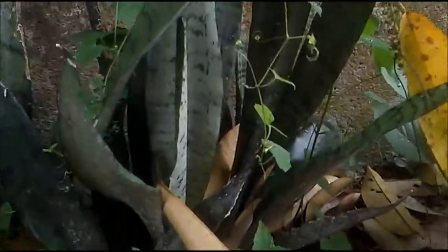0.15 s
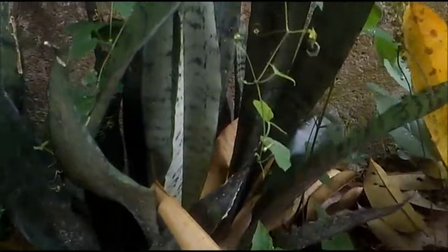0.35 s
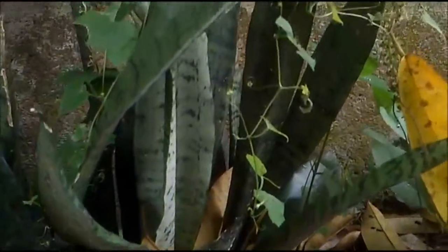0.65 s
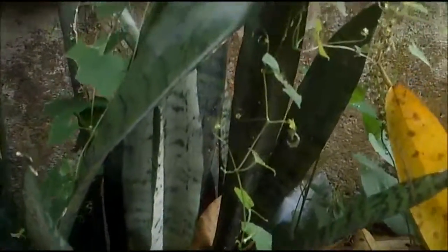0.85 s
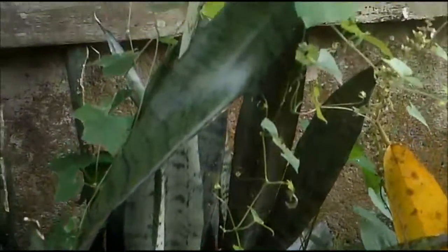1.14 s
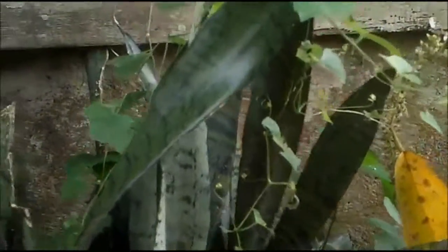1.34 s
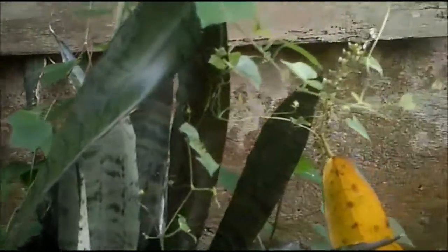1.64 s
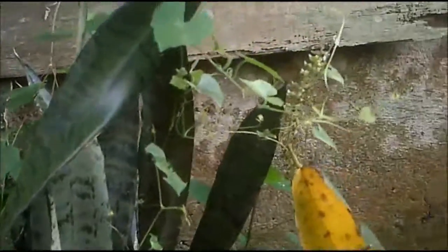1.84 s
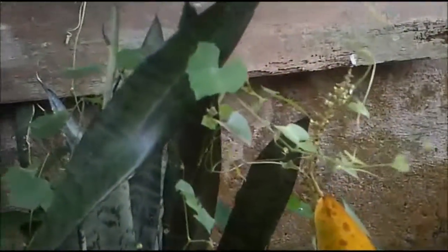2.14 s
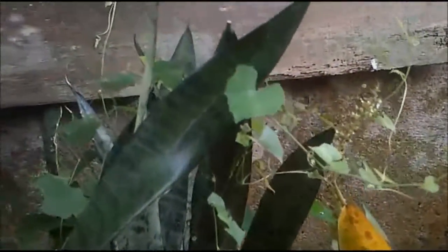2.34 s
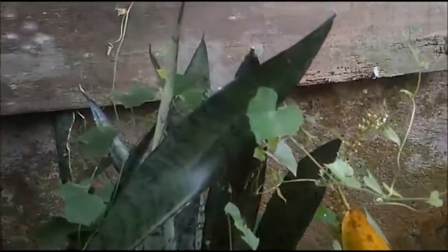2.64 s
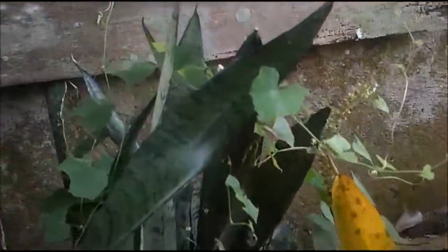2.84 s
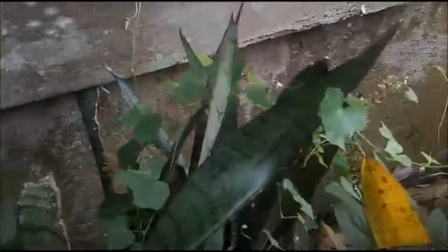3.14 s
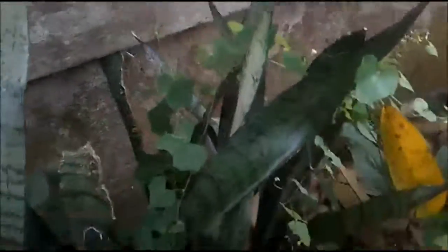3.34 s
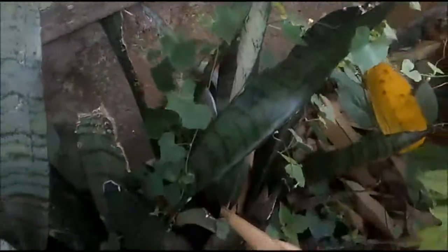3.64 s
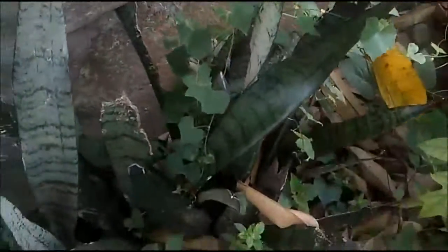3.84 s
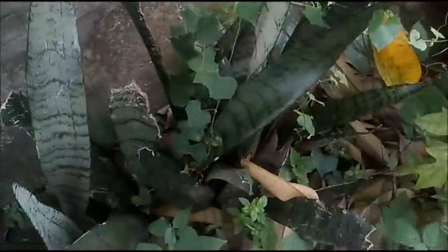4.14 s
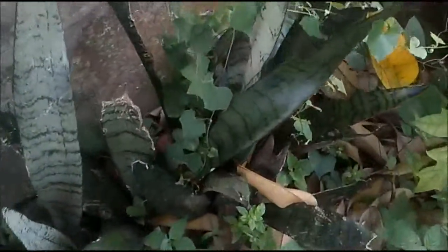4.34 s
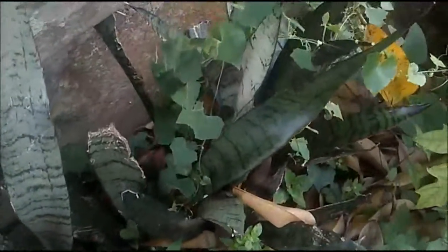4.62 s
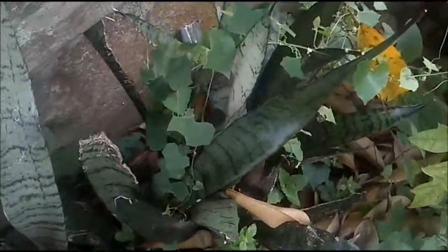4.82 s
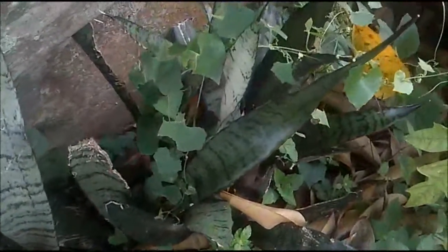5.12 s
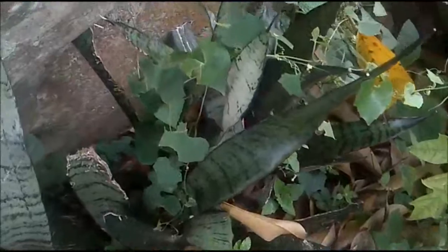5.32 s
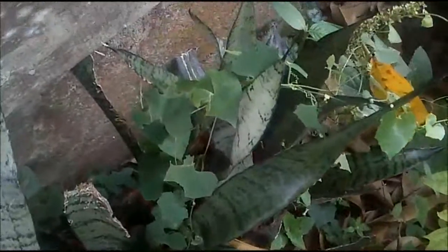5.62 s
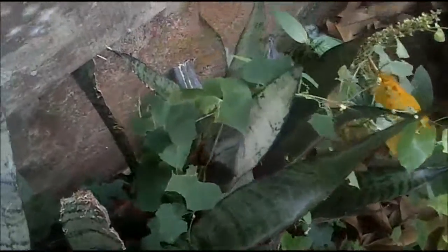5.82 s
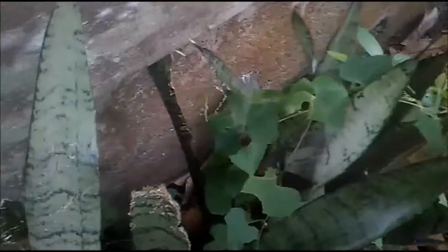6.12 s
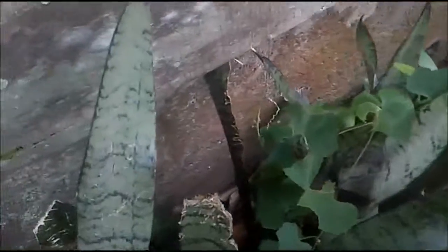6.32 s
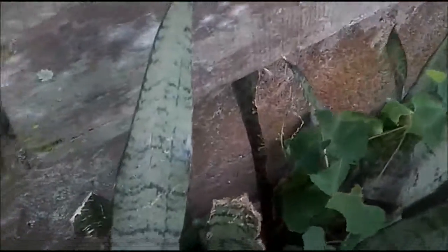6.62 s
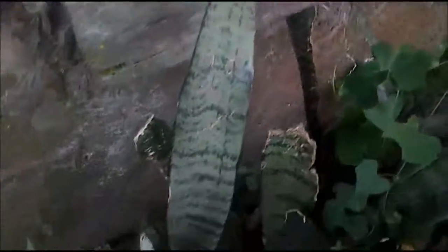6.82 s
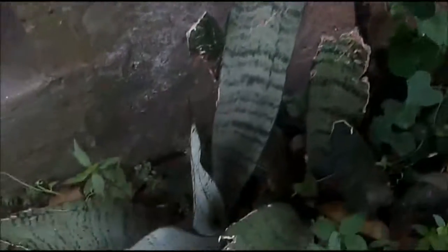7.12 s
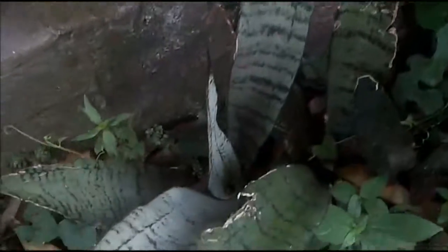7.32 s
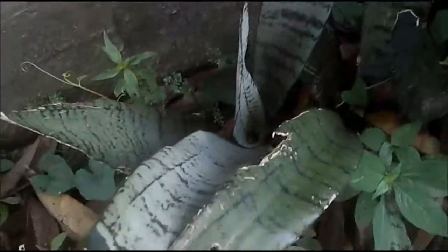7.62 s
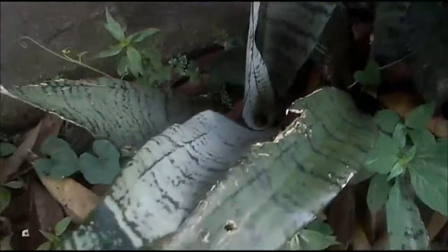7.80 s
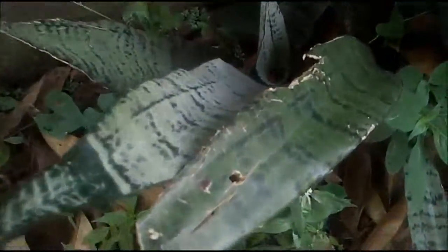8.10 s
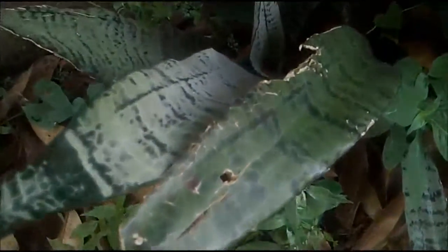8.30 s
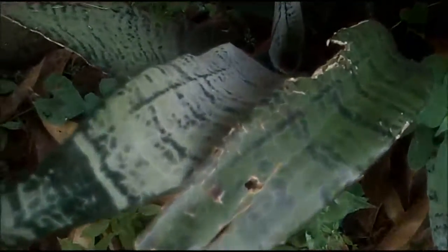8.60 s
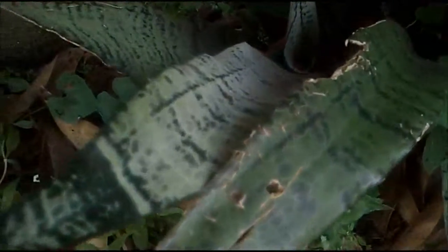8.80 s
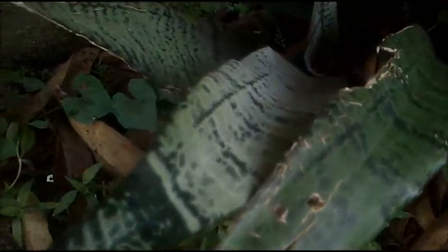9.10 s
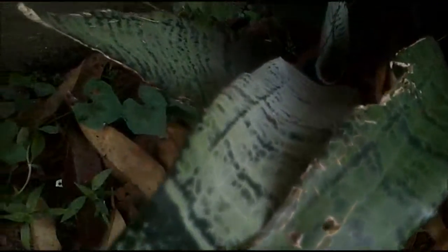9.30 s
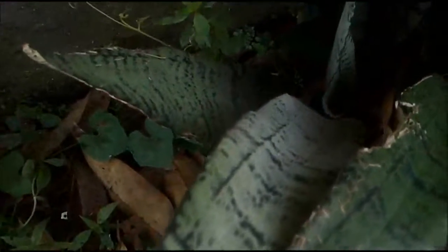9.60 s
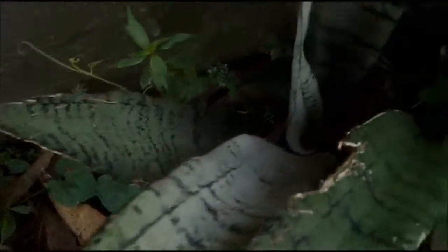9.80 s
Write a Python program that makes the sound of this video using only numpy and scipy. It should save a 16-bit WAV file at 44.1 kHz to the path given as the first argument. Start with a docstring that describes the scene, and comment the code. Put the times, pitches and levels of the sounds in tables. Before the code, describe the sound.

Lively garden birdsong in rapid high notes, a harsh scold midway, then an echoing second bird, with soft wind rumble and ticking leaves underneath.

```python
"""Small birds in a garden

Birds sing straight ahead: dry whistles, sweeps and trills, drawn as gliding tones, with a scold and a far wheeze.
A farther bird on the left adds notes and nasal chips that hang between the walls in decaying noise echoes.
Wind pushes slowly on the stereo microphone and leaves hiss and tick all around: shaped noise and short clicks.
Dull garden noise lies underneath.
"""
import sys
import numpy as np
from scipy import signal
from scipy.fft import rfft, irfft, next_fast_len
from scipy.io import wavfile
from scipy.ndimage import uniform_filter1d, map_coordinates

SR = 44100
rng = np.random.default_rng(int(sys.argv[2]) if len(sys.argv) > 2 else 0)


def store_wav(level_fs):
    """Save 16-bit WAV to argv[1]."""
    pcm = np.round(np.clip(np.atleast_2d(level_fs), -1, 1) * 32767)
    wavfile.write(sys.argv[1], SR, pcm.T.astype(np.int16))


N = 438794  # samples


def amp(db):
    """dB to gain."""
    return 10 ** (np.asarray(db) / 20)


def unit(x):
    """Scaled to rms 1."""
    return x / np.sqrt(np.mean(x ** 2) + 1e-20)


def along(points, hz):
    """Read (frequency [Hz], value) points on a log frequency axis."""
    f, v = np.transpose(points)
    return np.interp(np.log(hz + 1), np.log(f + 1), v)


def over_time(points):
    """Read (time [s], value) points at every sample."""
    return np.interp(np.arange(N) / SR, *np.transpose(points))


def wobble(rate, size):
    """A smooth random curve, rate knots a second."""
    knots = rng.standard_normal(int(size * rate / SR) + 4)
    return map_coordinates(knots, [np.arange(size) * rate / SR])


def filtered(x, response):
    """x shaped by a response of frequency."""
    m = next_fast_len(N + SR // 2)
    return irfft(rfft(x, m) * response(np.fft.rfftfreq(m, 1 / SR)), m)[..., :N]


def empty_track():
    """Silence with a spare second before and after."""
    return np.zeros(N + 2 * SR)


def add(track, s, sound):
    """Mix a sound in at s seconds; the track starts one second early."""
    track[round((s + 1) * SR):][:len(sound)] += sound


def trimmed(track):
    """The track without its spare seconds."""
    return track[SR:SR + N]


# stereo width of the noise around the microphone, side against mid: (frequency [Hz], level [dB])
SIDE_AGAINST_MID = [(60, -33), (200, -23), (380, -13), (700, -10), (1290, -12), (2380, -13.5), (4400, -3),
                    (8120, -27), (11500, -21), (15000, -11)]


def wide(mid, side, spectrum):
    """Coloured stereo of rms 1 from two unrelated signals."""
    def response(f):
        return amp(along(spectrum, f) + [0 * f, along(SIDE_AGAINST_MID, f)])

    mid, side = filtered(np.array([mid, side]), response)
    return unit(np.array([mid + side, mid - side]))


# level of the garden noise at the microphone: (time [s], level [dB])
GARDEN_LEVEL = [(0, -41), (4.6, -42), (6.4, -45.5), (9.95, -46)]
# colour of the garden noise: (frequency [Hz], relative level [dB])
GARDEN_COLOUR = [(35, -6), (60, -5.5), (152, -10), (496, -14.5), (1070, -20.5), (2080, -25), (3200, -32.5),
                 (4160, -44), (7040, -120)]


def garden_noise():
    """A dull, broad bed of noise whose spectrum falls toward the treble."""
    mid, side = rng.standard_normal((2, N))
    return wide(mid, side, GARDEN_COLOUR) * amp(over_time(GARDEN_LEVEL))


# strength of the breeze through the garden: (time [s], level [dB])
BREEZE = [(0, -8), (.8, -4), (1.3, -3), (1.8, 1.5), (2.7, 0), (4.2, 1.5), (5.3, .6), (6.1, -3.6), (7.4, -6),
          (8.6, -5), (9.95, -12)]


def breeze():
    """The breeze in dB that drives both wind pressure and leaves."""
    return over_time(BREEZE)


# colour of the wind pressure on the microphone: (frequency [Hz], relative level [dB])
WIND_PRESSURE = [(1.2, -18), (2.0, 1), (20, 4), (30, -18.5), (54, -23), (110, -51), (240, -120)]


def wind(breeze_db):
    """Low noise pushes on both ports; they differ a little more as the pressure changes faster."""
    def response(f):
        return amp(along(WIND_PRESSURE, f)) * [1 + 0 * f, f / 6000]

    push, tilt = filtered(rng.standard_normal((2, N)), response)
    # -17 dB at breeze 0 dB; the pressure swings wider than the breeze
    return unit(np.array([push + tilt, push - tilt])) * amp(-17 + 1.6 * breeze_db)


def crackle(rate, spread_db):
    """Sparse clicks under 3 ms long at rate per second, most of them small."""
    sizes_db = spread_db * np.minimum(rng.exponential(size=N), 2.5)
    hits = (rng.random(N) < rate / SR) * amp(sizes_db)
    decay = amp(-np.arange(120) * 0.18)  # dB per sample
    return unit(np.convolve(hits, decay)[:N] * rng.standard_normal(N))


# colour of the leaves all around: (frequency [Hz], relative level [dB])
LEAF_COLOUR = [(1760, -1), (3000, -10), (3990, -5.5), (5570, -2.5), (6670, -2), (8690, -4.5), (11100, 0.5),
               (13900, -2.5), (15800, -9)]


def leaves(breeze_db):
    """Hiss with fine crackle follows the breeze and flickers at three speeds."""
    grains = [rng.standard_normal(N) + .5 * crackle(200, spread_db=6.5) for _ in range(2)]
    flicker_db = 0.39 * wobble(6, size=N) + 1.4 * wobble(22, size=N) + 1.2 * wobble(60, size=N)
    return wide(*grains, LEAF_COLOUR) * amp(-40 + breeze_db + flicker_db)


# loud leaf ticks near the microphone: (time [s], starting level [dB])
LEAF_TICKS = [(.841, -26), (1.732, -25), (2.1609, -23.5), (3.211, -27), (3.3009, -28), (4.0108, -27),
              (4.129, -24), (4.2352, -25), (4.4443, -26), (4.6788, -24), (5.1188, -24.5), (8.4652, -30),
              (8.6537, -31), (8.8992, -27), (8.989, -30), (9.2374, -27)]


def ticks():
    """Each tick is a short noisy snap around its own pitch, a little to one side."""
    left, right = empty_track(), empty_track()
    t = np.arange(SR // 50) / SR
    for s, db in LEAF_TICKS:
        noise = rng.standard_normal(len(t))
        pitch_shift, to_left = rng.standard_normal(2)
        centre_hz = 10900 * (1 + .06 * pitch_shift)
        band = signal.lfilter(*signal.iirpeak(centre_hz, 2.1, SR), noise)
        snap = amp(db - 60 * t / .014) * unit(band)  # 60 dB down in 14 ms
        add(left, s, snap * amp(0.95 * to_left))
        add(right, s, snap * amp(-1.2 * to_left))
    return np.array([trimmed(left), trimmed(right)])


def controls(rows, fade=.005):
    """Time, rounded pitch and rms gain per sample of a note with soft ends (fade in seconds)."""
    s, hz, db = np.transpose(rows)
    t = np.arange(s[0] - fade / 2, s[-1] + fade / 2, 1 / SR)
    ends = np.clip(np.minimum(t - t[0], t[-1] - t) / fade, 0, 1)
    log_hz = np.interp(t, s, np.log(hz))
    pitch = uniform_filter1d(log_hz, size=min(len(t) // 6, 500), mode="nearest")
    return t, np.exp(pitch), amp(np.interp(t, s, db)) * np.sin(ends * np.pi / 2) ** 2


def whistle(hz, gain, second_db, flutter_db):
    """A nearly pure tone with an unsteady level; its octave shows more on high notes."""
    phase = 2 * np.pi * np.cumsum(hz) / SR
    octave = amp(second_db) * (np.minimum(hz, 5000) / 4000) ** 2 * np.sin(2 * phase)
    flutter = amp(flutter_db * wobble(200, size=len(hz)))
    return np.sqrt(2) * gain * flutter * (np.sin(phase) + octave)


def note(s, length, from_hz, bend_hz, to_hz, bend, peak_db, peak):
    """Rows of a note that bends once and swells once."""
    u = np.unique([0, bend, peak, 1])
    hz = np.exp(np.interp(u, [0, bend, 1], np.log([from_hz, bend_hz, to_hz])))
    db = peak_db - 14 * np.abs(u - peak)  # dB lost over a whole note length away from the peak
    return np.transpose([s + length * u, hz, db])


def run(start_s, count, gap_s, grow_s, soft_db=0, tire_db=0, climb=0, name=None):
    """(name, time [s], gain [dB], pitch ratio) for each member of an even run with growing gaps."""
    members = []
    for k in range(count):
        s = start_s + k * gap_s + k * (k - 1) / 2 * grow_s
        db = -soft_db * .4 ** k - tire_db * k  # the soft start wears off, then the run tires
        members.append((name, s, db, 1 + climb * k))
    return members


def song(notes, syllables, repeats, runs, second_db):
    """Single notes, and syllables sung at their times, levels and pitches."""
    track = empty_track()
    sung = [(note(*row), 0, 0, 1) for row in notes]
    calls = list(repeats)
    for row in runs:
        calls += run(**row)
    for name, s, db, ratio in calls:
        sung += [(stroke, s, db, ratio) for stroke in syllables[name]]
    for rows, s, db, ratio in sung:
        t, hz, gain = controls(rows)
        # faint birds are far away, and moving air makes them flicker
        flutter_db = np.interp(20 * np.log10(gain.max()), [-36, -22], [3.2, .9])
        add(track, s + t[0], whistle(hz * ratio, gain * amp(db), second_db, flutter_db))
    return trimmed(track)


def diffuse_echoes(x, decays):
    """Stereo echoes as a noise tail; each frequency dies at its own speed."""
    hz, t, z = signal.stft(rng.standard_normal((2, SR)), SR, nperseg=256)
    dying = z * amp(-60 * t / along(decays, hz)[:, None])
    tail = signal.istft(dying, SR, nperseg=256)[1]
    delayed = np.pad(x, (150, 0))  # samples
    return signal.fftconvolve(delayed[None], tail / np.linalg.norm(tail[0]), axes=1)[:, :N]


# single notes of the farther bird on the left: (time [s], length [s], first pitch [Hz], bend pitch [Hz],
# last pitch [Hz], bend place [0-1], peak level [dB], peak place [0-1])
LEFT_SINGLE_NOTES = [(7.294, .012, 2900, 3250, 3400, .5, -40, .6),
                     (7.202, .006, 2120, 2830, 3780, .5, -45, .4),
                     (7.247, .006, 2255, 3010, 4020, .5, -39, .4),
                     (7.99, .05, 4350, 4620, 4900, .5, -47, .6),
                     (8.095, .015, 3230, 3510, 3810, .5, -42, .6),
                     (7.848, .075, 1300, 1900, 2030, .15, -26, .85),
                     (7.963, .057, 1250, 1930, 2030, .2, -31, .85)]
# its syllables by name, stroke by stroke: (time from the start [s], pitch [Hz], level [dB])
LEFT_STROKES = dict( intro=[[(0, 2700, -33), (.031, 2150, -32), (.053, 2830, -24), (.09, 2790, -28)],
                [(.147, 3900, -28), (.165, 4450, -24), (.181, 6970, -44), (.193, 3900, -21),
                (.207, 3150, -22), (.22, 3050, -30)]], sweep=[[(0, 3900, -27), (.006, 2370, -27.5),
                (.022, 3480, -20), (.037, 4940, -22.5), (.052, 5210, -26.5)], [(-.027, 13280, -50),
                (.004, 13120, -56)]], dive=[[(.001, 8400, -38), (.009, 4320, -20), (.017, 2750, -27),
                (.031, 2500, -26.5), (.062, 2760, -24), (.092, 3320, -22)]], dip=[[(.004, 1760, -38.5),
                (.025, 980, -47.5), (.047, 2180, -27.5), (.062, 2110, -33)]], closer=[[(0, 3540, -41),
                (.007, 6840, -27.5), (.015, 6560, -36), (.03, 5980, -27)], [(.01, 6850, -38),
                (.062, 6800, -45)]], )
# its syllables sung one at a time: (name, time [s], gain [dB], pitch ratio)
LEFT_CALLS = [("intro", 7.3, 0, 1), ("sweep", 8.118, 0, .985), ("sweep", 8.276, .5, 1.005),
              ("sweep", 8.432, 1, .98), ("sweep", 8.585, 0, 1.003), ("sweep", 8.747, -1, .98),
              ("closer", 9.885, 0, 1)]
# its even runs: name, start [s], count, first gap [s], growth of each gap [s], soft start [dB],
# level lost per syllable [dB], pitch gained per syllable [ratio]
LEFT_EVEN_RUNS = [ dict(name="dive", start_s=8.905, count=3, gap_s=.193, grow_s=.011, soft_db=.6, tire_db=.1, climb=-.005),
                  dict(name="dip", start_s=9.458, count=4, gap_s=.1035, grow_s=.0008, tire_db=.4, climb=.026),
                  ]


def left_song():
    """The left bird's whistles, with little octave in them."""
    return song(LEFT_SINGLE_NOTES, LEFT_STROKES, LEFT_CALLS, LEFT_EVEN_RUNS, second_db=-46)


# run of chip pairs from the left: start [s], count, first gap [s], growth of each gap [s], soft start [dB]
CHIP_RUN = dict(start_s=7.595, count=4, gap_s=.045, grow_s=.006, soft_db=4.5)
# overtones 3 to 6 of a chip, in order: (relative level [dB])
CHIP_OVERTONES = [-7, 0.5, -7, 1.5]


def chatter():
    """Pairs of short nasal chips: a falling stack of overtones."""
    track, t = empty_track(), np.arange(round(0.0074 * SR)) / SR
    phase = 2 * np.pi * np.cumsum(np.linspace(1060, 860, len(t))) / SR
    stack = sum(amp(db) * np.sin(k * phase) for k, db in enumerate(CHIP_OVERTONES, start=3))
    breathy_edge = 1 + 0.5 * rng.standard_normal(len(t))
    chip = np.hanning(len(t)) * stack * breathy_edge
    for _, s, db, _ in run(**CHIP_RUN):
        for delay_s in (0, .013):
            add(track, s + delay_s, amp(-35.5 + db) * chip)
    return trimmed(track)


# single walls that answer the left bird: (delay [s], level [dB])
WALL_ANSWERS = [(.009, -15.5), (.0415, -23), (.058, -25)]
# dying of the echoes between the walls: (frequency [Hz], time to fall 60 dB [s])
WALL_DECAY = [(1500, 0.48), (3000, 0.64), (7000, 0.63)]


def between_walls(bird):
    """The bird with single wall echoes and a diffuse stereo tail."""
    def answers(f):
        return sum(amp(db) * np.exp(-2j * np.pi * f * s) for s, db in WALL_ANSWERS)

    tail = diffuse_echoes(bird, WALL_DECAY)
    common = tail.mean(0)
    spread = common + 0.88 * (tail - common)  # the two ports hear almost independent echoes, so the tail stays wide
    return bird + filtered(bird, answers) + amp(-9.5) * spread


def from_left(x):
    """Sound reaches the left port of the microphone first and louder."""
    def lead(f):
        cycles = f * 2.1e-5 * np.exp(-(f / 8500) ** 4)  # the ports agree again in the treble
        return amp([[1.3], [-1.3]]) * np.exp(2j * np.pi * cycles * np.array([[1], [-1]]))

    return filtered(x, lead)


# far wheezy call in three sagging strands, each a list of: (time [s], pitch [Hz], level [dB])
WHEEZE_STRANDS = [
    [(1.33, 3720, -54), (1.6, 3600, -54), (1.75, 3550, -59)],
    [(1.3, 4150, -54), (1.65, 4090, -49), (1.89, 3950, -48)],
    [(1.66, 4700, -56), (1.77, 4600, -47), (1.89, 4400, -48)],
]


def wheeze():
    """Fast random pitch shake makes three far whistles hoarse."""
    track = empty_track()
    for rows in WHEEZE_STRANDS:
        t, hz, gain = controls(rows)
        hoarse = hz * (1 + .035 * wobble(600, size=len(t)))
        add(track, t[0], whistle(hoarse, gain, second_db=-50, flutter_db=2))
    return trimmed(track)


# harsh scold ahead: (time [s], lower voice [Hz], upper voice [Hz], level [dB])
SCOLD_VOICES = [(5.877, 1400, 2000, -21), (5.888, 1430, 1890, -27), (5.903, 1570, 1920, -29),
                (5.935, 1440, 1800, -30), (5.957, 1390, 1720, -40)]
# colour of its throat: (frequency [Hz], gain [dB])
SCOLD_THROAT = [(1000, -70), (1700, -25), (2400, -28), (3200, -19), (4300, -11), (5000, 0), (6200, -9),
                (8000, -30), (14000, -90)]


def scold():
    """Two voices gate the same air, so sums and differences of their pitches sound."""
    track = empty_track()
    t, low, gain = controls([(s, lower, db) for s, lower, _, db in SCOLD_VOICES])
    _, high, _ = controls([(s, upper, db) for s, _, upper, db in SCOLD_VOICES])
    shaky = [hz * (1 + .016 * wobble(200, size=len(t))) for hz in (low, high)]
    gate = np.exp(3 * sum(np.cos(2 * np.pi * np.cumsum(hz) / SR) for hz in shaky))
    air = unit(gate) + .55 * rng.standard_normal(len(t))
    voiced = filtered(air, lambda f: amp(along(SCOLD_THROAT, f)))[:len(t)]
    add(track, t[0], gain * unit(voiced))
    return trimmed(track)


# trills of short falling pips ahead, each a list of: (time [s], pip rate [Hz], level before pip shaping [dB])
PIP_TRILLS = [
    [(6.45, 81, -42.5), (6.878, 72.9, -28.5), (7.128, 63, -33)],
    [(7.4, 73.0, -41.5), (7.66, 68.8, -39), (7.89, 65.0, -47.5)],
]


def trills():
    """Each pip falls in pitch and swells early; slower pips fall further."""
    track = empty_track()
    for rows in PIP_TRILLS:
        t, rate, gain = controls(rows)
        cycle = np.cumsum(rate * (1 + .025 * wobble(40, size=len(t)))) / SR % 1
        pip = np.sin(np.pi * cycle ** 0.85) ** 2
        hz = 7100 - 48000 / rate * cycle
        add(track, t[0], whistle(hz, 0.72 * gain * pip, second_db=-50, flutter_db=2.2))
    return trimmed(track)


# falling warbles ahead: (vibrato rate [Hz], mean vibrato depth [share], octave-down voice [dB]),
# then a list of: (time [s], centre pitch [Hz], level [dB])
FALLING_WARBLES = [((45.5, .075, -9), [(1.783, 3280, -40), (1.9, 2820, -40.5), (1.955, 2500, -49)]),
                   ((91, .135, -30), [(5.7505, 3900, -22), (5.758, 3350, -23), (5.785, 2050, -26),
                   (5.805, 1780, -36), (5.838, 1780, -38)])]


def warbles():
    """Vibrato of unsteady depth on a falling whistle, with a second voice an octave down."""
    track = empty_track()
    for (rate_hz, depth, under_db), rows in FALLING_WARBLES:
        t, hz, gain = controls(rows)
        swing = depth * amp(2 * wobble(59.5, size=len(t)))
        hz = hz * (1 - swing * np.cos(2 * np.pi * rate_hz * (t - rows[0][0])))
        add(track, t[0], whistle(hz, gain, second_db=-35, flutter_db=2.2))
        add(track, t[0], whistle(hz / 2, gain * amp(under_db), second_db=-35, flutter_db=3))
    return trimmed(track)


# single notes of the birds straight ahead: (time [s], length [s], first pitch [Hz], bend pitch [Hz],
# last pitch [Hz], bend place [0-1], peak level [dB], peak place [0-1])
AHEAD_SINGLE_NOTES = [ (.2, .09, 7900, 7150, 6700, .4, -44, .6),
                      (.307, .016, 3300, 6900, 7610, .5, -34, .6),
                      (.42, .02, 4400, 4700, 5300, .5, -44, .5),
                      (.335, .075, 6000, 5820, 5640, .5, -46, .2),
                      (.445, .03, 4800, 3980, 4130, .3, -39, .05),
                      (.47, .075, 5040, 4900, 5300, .27, -47, .9),
                      (.52, .04, 8400, 8300, 7610, .65, -46, .6),
                      (.59, .045, 6720, 6630, 5550, .47, -35, .95),
                      (.705, .052, 7900, 9300, 7400, .5, -42, .9),
                      (.74, .04, 6100, 5740, 6250, .6, -45, .95),
                      (.785, .04, 6270, 5180, 4280, .5, -31, .7),
                      (.862, .028, 3600, 4140, 3880, .29, -39, .05),
                      (1.03, .15, 6170, 4480, 4900, .7, -48, .3),
                      (1.207, .015, 4000, 3950, 3900, .5, -31.5, .05),
                      (1.423, .062, 6300, 5340, 5340, .2, -36, .05),
                      (1.687, .015, 6250, 5530, 4900, .5, -36, .1),
                      (2.238, .01, 3040, 3190, 3340, .5, -30, .05),
                      (2.24, .098, 2600, 2126, 2055, .42, -23, .3),
                      (2.69, .06, 5600, 4500, 4550, .33, -43, .3),
                      (3.325, .085, 5300, 7800, 6800, .47, -35, .4),
                      (4.95, .03, 3070, 3650, 4330, .5, -41, .95),
                      (4.96, .02, 4100, 4900, 5400, .5, -29, .6),
                      (5.4, .022, 7800, 7400, 7000, .5, -42, .8),
                      (4.08, .085, 2850, 2380, 2450, .5, -50, .3),
                      (5.533, .007, 2800, 3000, 3100, .5, -38, .5),
                      (5.535, .032, 2350, 2530, 2650, .5, -23, .65),
                      (5.609, .027, 3340, 3300, 3520, .68, -21.5, .7),
                      (5.655, .032, 4040, 3945, 4010, .4, -19, .45),
                      (6.27, .03, 1460, 2040, 3820, .8, -46, .95),
                      (6.255, .042, 4050, 3600, 4150, .55, -46, .5),
                      (6.385, .035, 3850, 3800, 3760, .5, -46, .2),
                      (6.632, .018, 4300, 4980, 5700, .4, -43, .6),
                      (6.633, .03, 3200, 4200, 5120, .3, -43, .6), ]
# their syllables by name, stroke by stroke: (time from the start [s], pitch [Hz], level [dB])
AHEAD_STROKES = dict( plunge=[[(0, 4940, -32), (.01, 5160, -15), (.021, 4080, -16), (.033, 1980, -26)]],
                 tick_up=[[(0, 3820, -40), (.04, 3440, -37.5), (.054, 4940, -27), (.07, 5400, -31)]],
                 glide=[[(0, 7500, -40), (.028, 6150, -33.5), (.051, 6780, -35.5), (.19, 7130, -36.5)]],
                 lift=[[(0, 1560, -32.5), (.017, 2150, -22.5), (.025, 2090, -30)]],
                 stairs=[[(-.004, 7300, -42), (.012, 5900, -31), (.022, 5300, -29), (.043, 5330, -36),
                 (.06, 3440, -56), (.105, 3200, -49)]], drop=[[(0, 6900, -40), (.008, 5500, -30),
                 (.016, 3790, -46), (.077, 3780, -48), (.11, 3000, -52), (.135, 3600, -54)]],
                 hook=[[(0, 7300, -42), (.009, 5600, -27), (.018, 4350, -49.5), (.062, 4540, -42),
                 (.08, 4500, -50)], [(.12, 4800, -43), (.135, 4450, -48)]], opener=[[(0, 7250, -43),
                 (.009, 7610, -32), (.064, 7170, -33), (.075, 6290, -30), (.1, 4040, -34)],
                 [(.075, 3860, -35), (.082, 4100, -29), (.149, 3810, -30), (.188, 4150, -32),
                 (.215, 5270, -22.5)]], roof=[[(0, 5350, -43), (.007, 5810, -33), (.048, 6420, -31),
                 (.08, 4080, -33.5)]], flick=[[(0, 6440, -25), (.007, 7300, -36), (.02, 7040, -44)],
                 [(.021, 7590, -25), (.025, 5920, -15), (.029, 3320, -28.5)]], pair=[[(0, 1830, -22),
                 (.013, 1260, -31)], [(.059, 1974, -18), (.073, 2420, -9), (.086, 2790, -8.5),
                 (.095, 2700, -22)]], snap=[[(0, 2400, -30), (.004, 4300, -12), (.007, 5700, -22)],
                 [(.003, 2200, -34), (.008, 4300, -8.5), (.0125, 5400, -5), (.018, 4200, -7),
                 (.023, 2600, -24)], [(.023, 2600, -26), (.034, 1800, -30), (.038, 1740, -40),
                 (.055, 1670, -41)], [(.022, 5300, -17), (.031, 3700, -27), (.036, 3420, -16.5),
                 (.052, 3370, -19), (.062, 3360, -29)]], )
# syllables sung one at a time: (name, time [s], gain [dB], pitch ratio)
AHEAD_CALLS = [("lift", -.002, -5, .94), ("plunge", .087, 0, 1), ("tick_up", .312, 0, 1),
               ("glide", .96, 0, 1), ("opener", 1.945, 0, 1), ("snap", 3.145, 0, 1),
               ("stairs", 2.011, -3, 1.02), ("stairs", 3.022, -1.5, 1), ("stairs", 3.64, -2, 1.03),
               ("stairs", 3.94, 0, 1), ("stairs", 5.335, -1, 1), ("stairs", 5.701, -4.5, 1.02),
               ("drop", 2.335, -2, 1.03), ("drop", 3.342, -1.5, .97), ("drop", 4.29, 0, 1),
               ("drop", 6.018, -7.5, .99), ("hook", 4.615, 0, 1), ("hook", 4.977, 0, 1)]
# even runs: name, start [s], count, first gap [s], growth of each gap [s], soft start [dB],
# level lost per syllable [dB], pitch gained per syllable [ratio]
AHEAD_EVEN_RUNS = [ dict(name="lift", start_s=.128, count=3, gap_s=.042, grow_s=.002, tire_db=1.1, climb=-.01),
                   dict(name="roof", start_s=2.082, count=8, gap_s=.1175, grow_s=.0013, soft_db=.6, tire_db=.25, climb=.005),
                   dict(name="flick", start_s=2.406, count=4, gap_s=.081, grow_s=.003, soft_db=5.5, climb=.003),
                   dict(name="pair", start_s=2.736, count=3, gap_s=.1345, grow_s=.001, soft_db=4.2), ]


def ahead_song():
    """Dry whistles and sweeps straight ahead of the microphone."""
    return song(AHEAD_SINGLE_NOTES, AHEAD_STROKES, AHEAD_CALLS, AHEAD_EVEN_RUNS, second_db=-33)


# dying of the foliage echo of the birds ahead: (frequency [Hz], time to fall 60 dB [s])
FOLIAGE_DECAY = [(2000, 0.19), (4000, 0.16), (7000, 0.24)]
# leaves scatter high notes more: (frequency [Hz], level [dB])
FOLIAGE_SCATTER = [(2000, -21.5), (4000, -13), (7000, -4.5)]


def among_leaves(birds):
    """The dry birds with a short, bright foliage echo in the centre."""
    echo = diffuse_echoes(birds, FOLIAGE_DECAY).mean(0)
    return birds + filtered(echo, lambda f: amp(along(FOLIAGE_SCATTER, f)))


def scene():
    """Garden, wind and leaves all around, the left bird between walls, and the birds ahead."""
    breeze_db = breeze()
    background = garden_noise() + wind(breeze_db) + leaves(breeze_db) + ticks()
    left = from_left(between_walls(left_song() + chatter()))
    ahead = among_leaves(wheeze() + scold() + trills() + warbles() + ahead_song())
    return background + left + ahead


def record(dry):
    """The microphone's input stage rounds off the loudest peaks; nothing is kept above 15950 Hz."""
    soft = dry / (1 + np.abs(dry / .63) ** 5) ** (1 / 5)
    return filtered(soft, lambda hz: hz < 15950)


dry = scene()
out = record(dry)
store_wav(out)
```